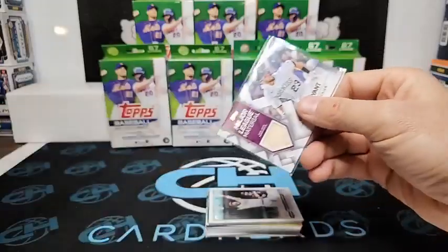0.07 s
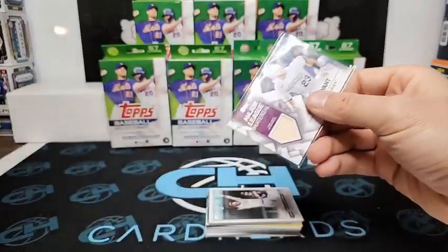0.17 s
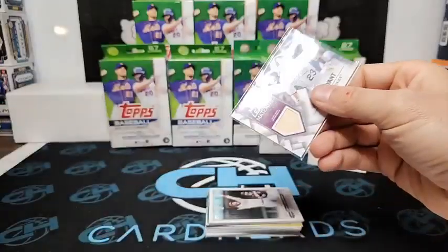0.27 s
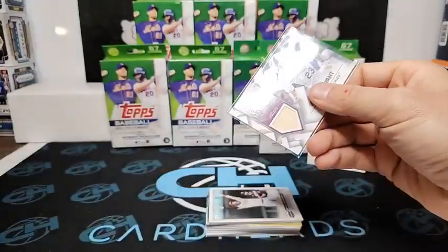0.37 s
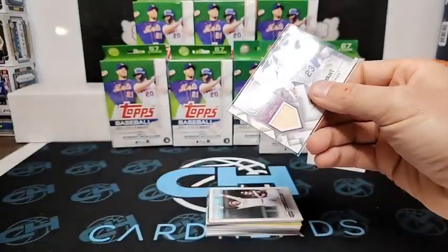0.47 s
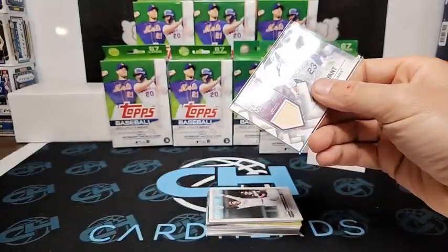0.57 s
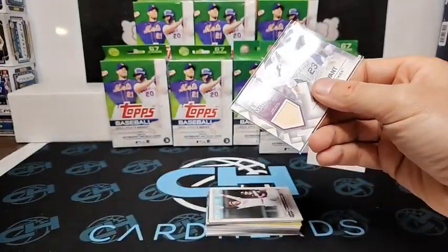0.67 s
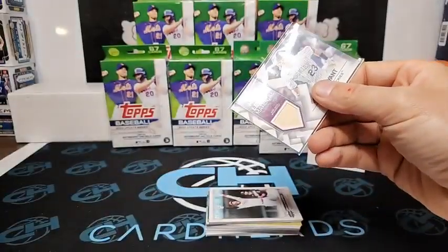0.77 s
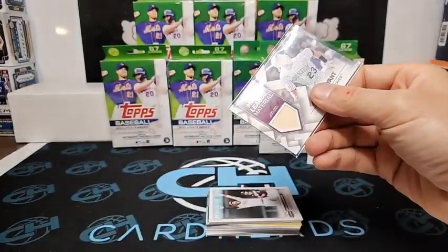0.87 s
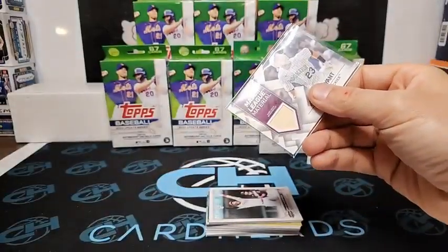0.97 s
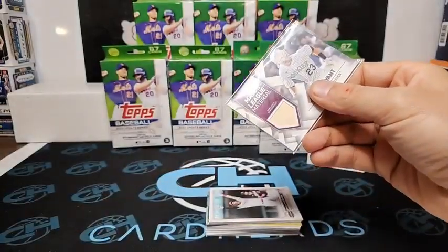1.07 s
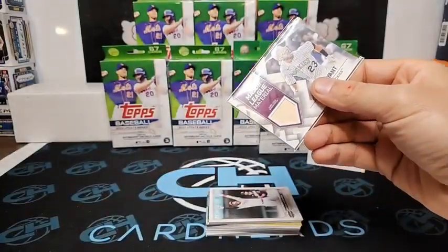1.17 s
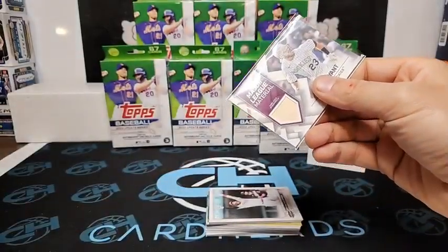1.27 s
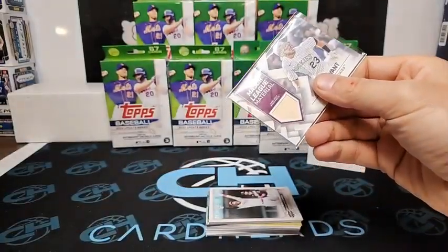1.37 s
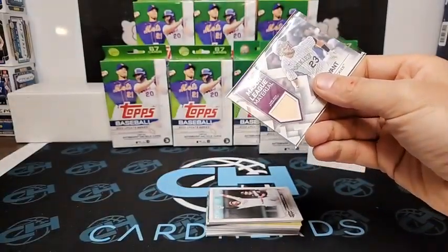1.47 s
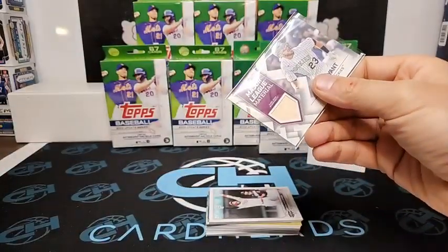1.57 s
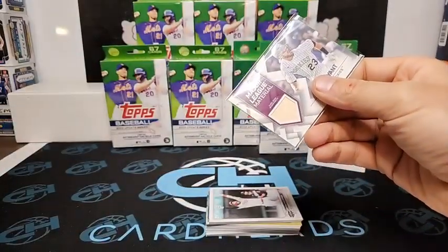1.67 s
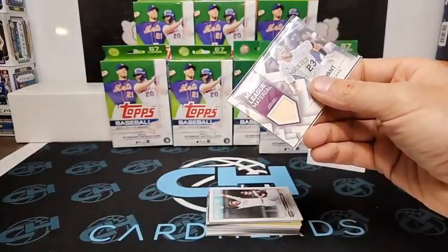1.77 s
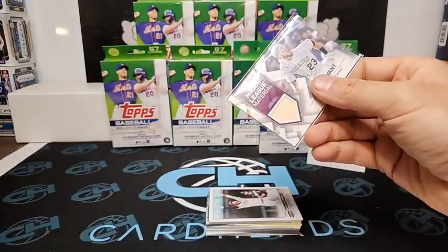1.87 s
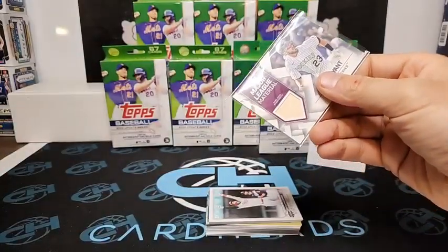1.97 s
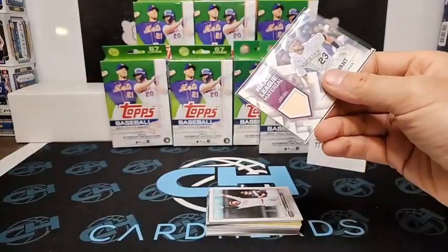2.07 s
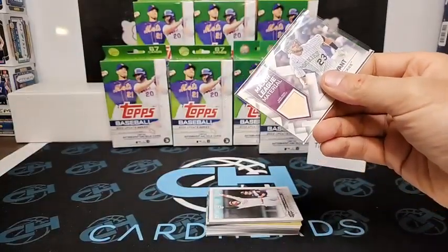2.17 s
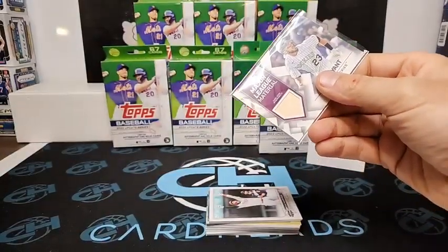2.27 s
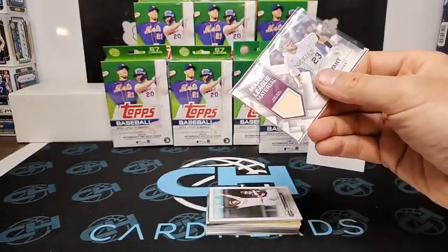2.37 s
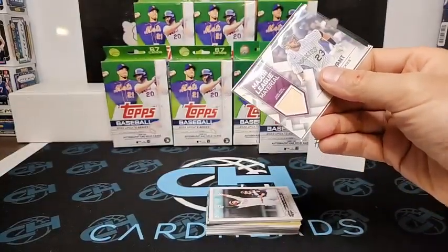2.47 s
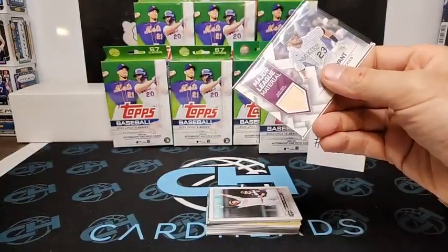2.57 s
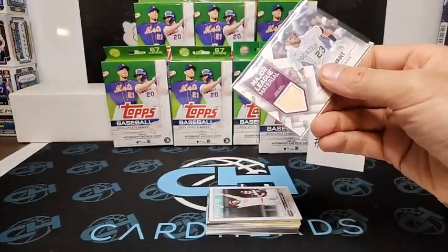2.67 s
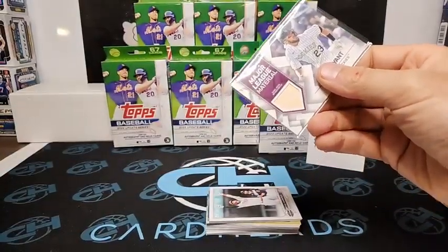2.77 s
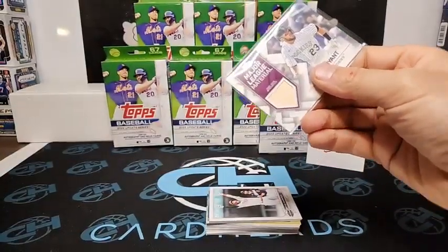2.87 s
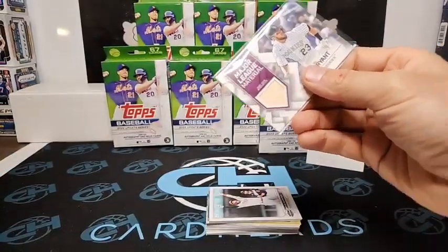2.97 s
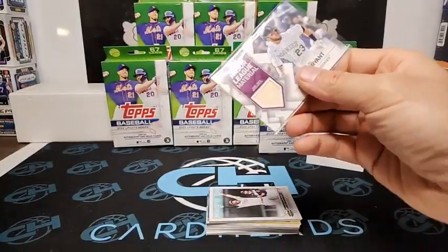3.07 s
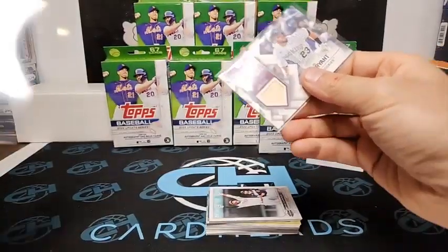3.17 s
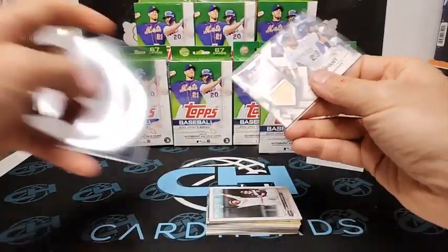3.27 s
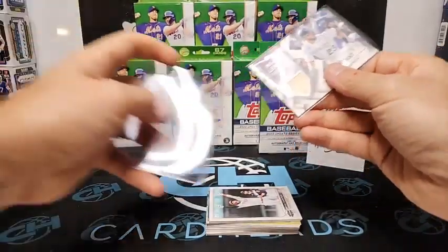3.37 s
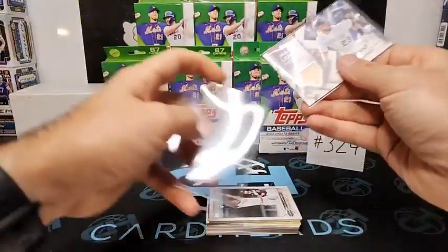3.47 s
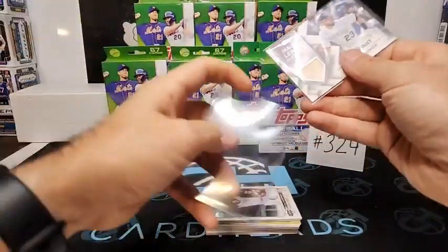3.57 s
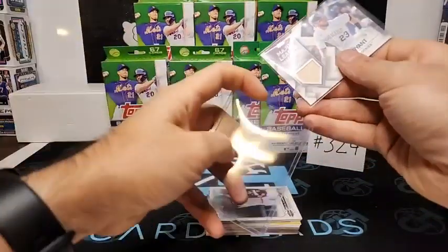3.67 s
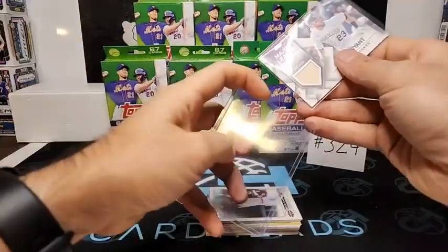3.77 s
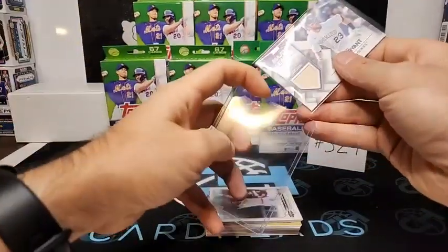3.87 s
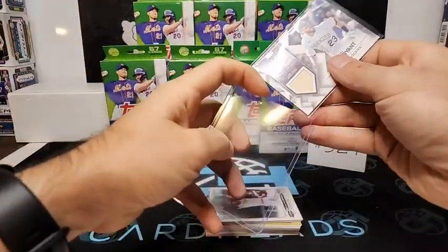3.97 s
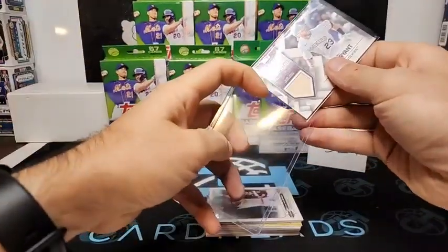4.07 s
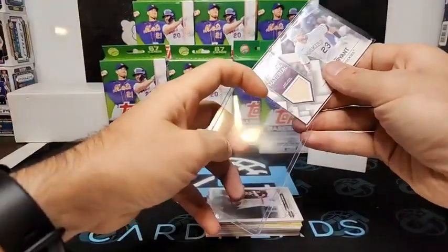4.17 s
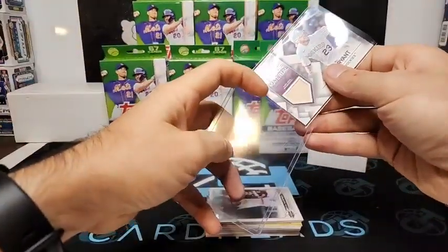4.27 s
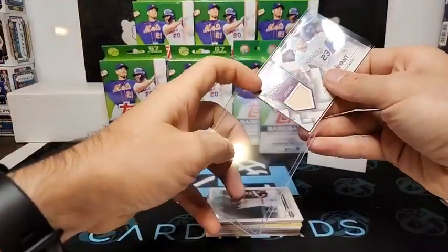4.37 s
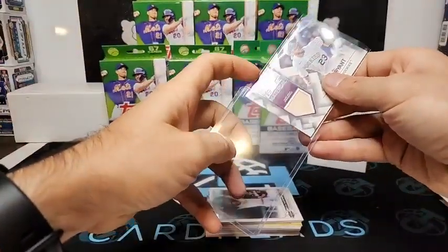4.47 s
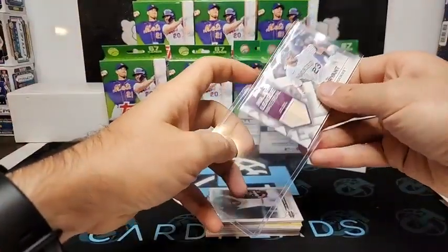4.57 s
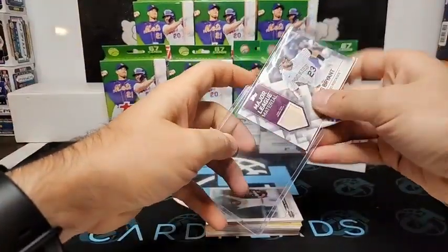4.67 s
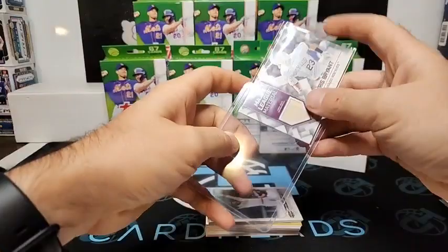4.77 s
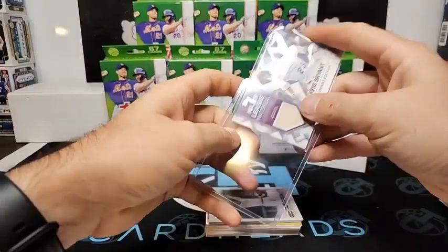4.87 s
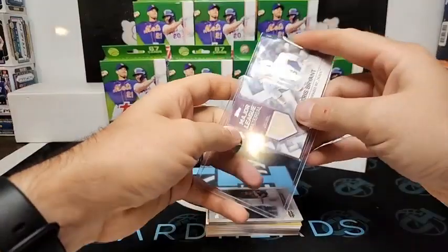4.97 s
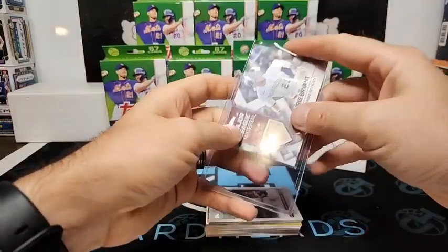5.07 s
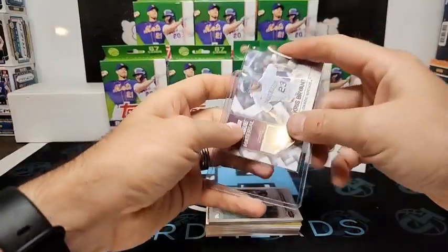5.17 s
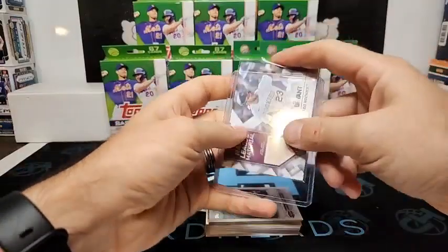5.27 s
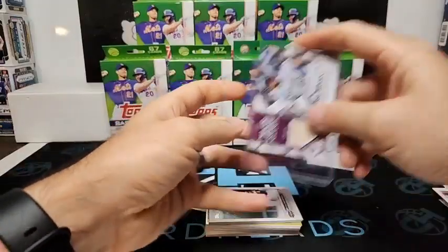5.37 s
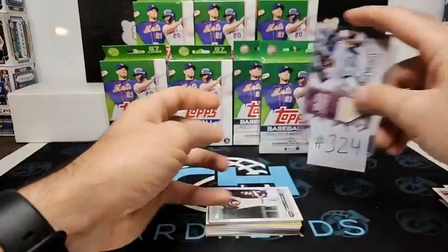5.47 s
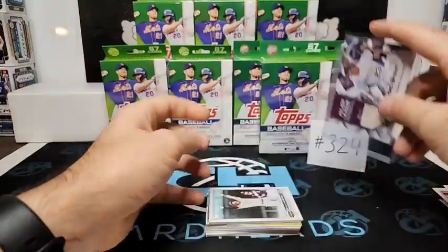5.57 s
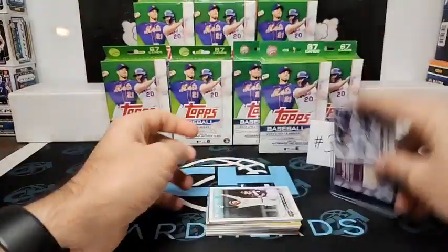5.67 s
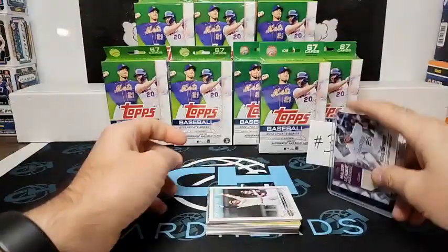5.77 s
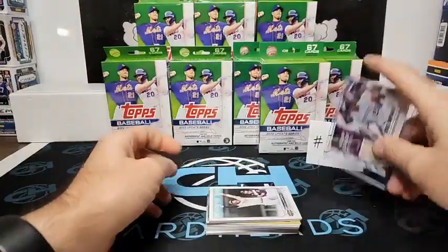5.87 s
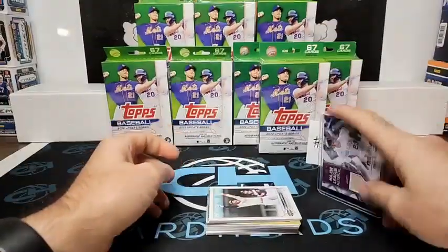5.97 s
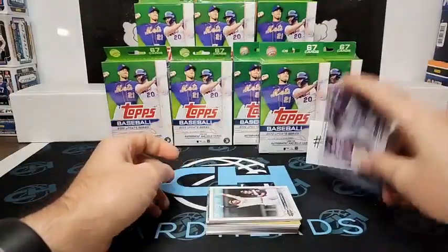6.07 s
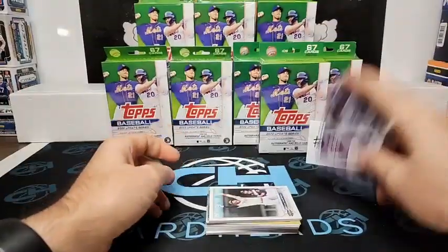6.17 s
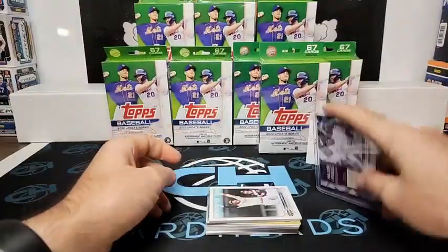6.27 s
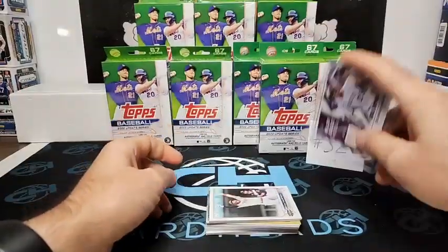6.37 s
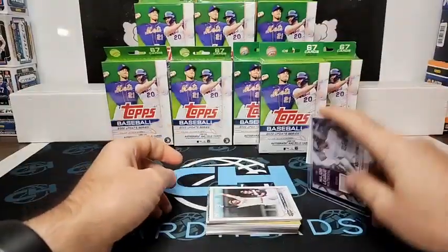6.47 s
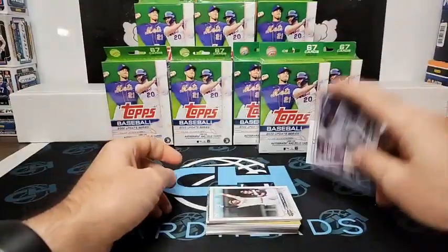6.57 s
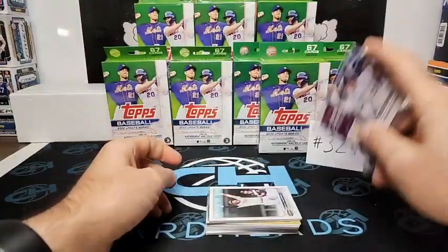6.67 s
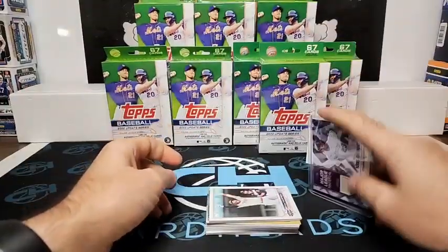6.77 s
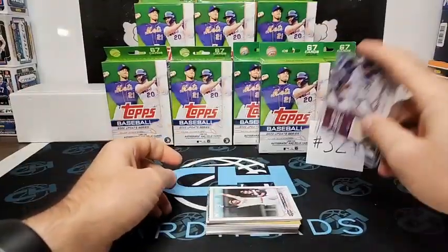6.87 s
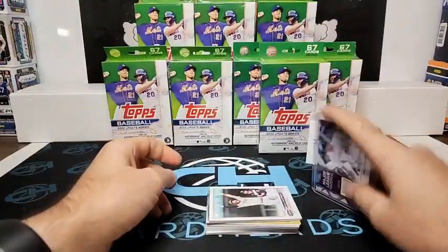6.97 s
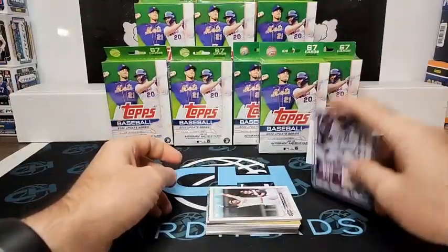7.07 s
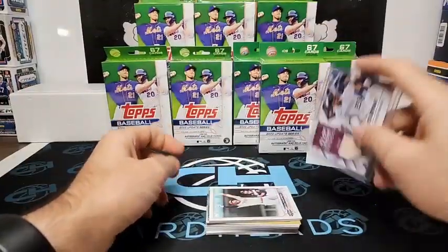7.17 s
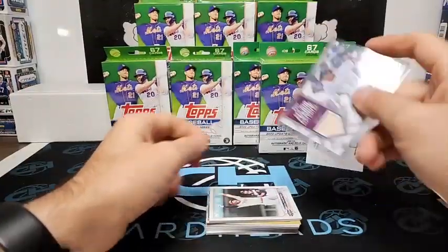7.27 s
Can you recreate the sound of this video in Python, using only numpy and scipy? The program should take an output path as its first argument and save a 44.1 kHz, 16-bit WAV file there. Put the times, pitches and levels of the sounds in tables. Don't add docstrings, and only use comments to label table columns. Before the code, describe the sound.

Close in a small furnished room with faint motor hum, a drawer rolls with a low gritty rumble. Thin plastic film crinkles. After a near-quiet pause, a rigid plastic holder creaks in a dry cluster of ticks, film rubs and squeaks faintly, and one sharp snap sounds. Then the holder's edge is knocked six times on a padded table, about four a second, with short room echo.

```python
import sys
import numpy as np
from scipy import signal
from scipy.fft import rfft, irfft
from scipy.io import wavfile

SR = 44100
rng = np.random.default_rng(int(sys.argv[2]) if len(sys.argv) > 2 else 0)


def volts_from_db(level):
    exponent = np.asarray(level, float) / 20
    return 10 ** exponent


def store_pcm(level_fs):
    pcm = np.round(np.clip(level_fs, -1, 1) * 32767).astype(np.int16)
    wavfile.write(sys.argv[1], SR, np.atleast_2d(pcm).T)


N = 322792

# (time [s], ring pitch [Hz], ring level [dB], table level [dB], crack level [dB])
TABLE_BLOWS = [
    (5.5806, 327.6, -13.5, -22.5, -41.5),
    (5.8589, 364, -12, -18.5, -29),
    (6.1023, 780, -20, -20.5, -34.5),
    (6.3703, 760, -14, -20, -37.5),
    (6.6288, 800, -19.5, -18.5, -25),
    (6.8628, 890, -22, -19, -34.5),
]


def rms_one(x):
    return x / np.sqrt(np.mean(x ** 2) + 1e-20)


def in_time(rows):
    s, *columns = np.transpose(rows)
    return [np.interp(np.arange(N) / SR, s, c) for c in columns]


def at_hz(points, hz):
    points = np.array(points)
    return np.interp(np.log(hz + 1), np.log(points[:, 0]), points[:, 1])


def colour(x, points):
    size = 8192
    hz = np.arange(size // 2 + 1) * SR / size
    cepstrum = irfft(np.log(volts_from_db(at_hz(points, hz))))
    cepstrum[1:size // 2] *= 2
    cepstrum[size // 2 + 1:] = 0
    return signal.fftconvolve(x, irfft(np.exp(rfft(cepstrum))))[:len(x)]


def band(x, low_hz, high_hz):
    sos = signal.butter(2, [low_hz, high_hz], "band", fs=SR, output="sos")
    return signal.sosfilt(sos, x + 1e-18)


def drift(rate_hz):
    r = np.exp(-2 * np.pi * rate_hz / SR)
    return rms_one(signal.lfilter([1], [1, -2 * r, r * r], rng.standard_normal(N + SR))[SR:])


def resonance(x, hz, width_hz):
    r = np.exp(-np.pi * width_hz / SR)
    poles = [1, -2 * r * np.cos(2 * np.pi * hz / SR), r * r]
    return signal.lfilter([(1 - r * r) / 2, 0, (r * r - 1) / 2], poles, x)


def grains(per_s, spread_db):
    sizes = volts_from_db(spread_db * np.minimum(rng.exponential(1, N), 4)) * rng.choice([-1, 1], N)
    return rms_one(sizes * (rng.random(N) < per_s / SR))


def gestures(rows, shares):
    t = np.arange(0, N + 32, 32) / SR
    s, db, rise, hold, fall, tone_db = np.transpose(rows)[:, :, None]
    before, after = np.maximum(s - t, 0), np.maximum(t - s - hold, 0)
    level_db = db - np.abs(rise) * before - np.abs(fall) * after
    gains = []
    for share in shares:
        power = (volts_from_db(level_db + share * tone_db) ** 2).sum(axis=0)
        gains.append(np.interp(np.arange(N) / SR, t, np.sqrt(power)))
    return gains


def knocks(blows, soft_db=0):
    # (frequency [Hz], level [dB], T60 [s])
    table_modes = [(93, 10.5, 0.09), (122.6, 15, 0.078), (147, -2.5, 0.16), (169.5, 3.5, 0.15),
                   (183.5, -5.5, 0.56), (228.7, 3.5, 0.14), (320.2, 1, 0.13), (415, 2, 0.063),
                   (424.4, -17.5, 0.44), (264.2, -14, 0.37), (760, 6, 0.027), (1207, -4, 0.044),
                   (502, -5.5, 0.14), (574, 4.5, 0.031), (692, 7, 0.033), (884, 12.5, 0.019),
                   (1130, 6.5, 0.038), (1470, 1, 0.0094), (1864, -11, 0.028), (2320, -20, 0.06),
                   (2600, -26, .06), (2980, -22.5, .05)]
    # (frequency [Hz], level [dB], T60 [s])
    shelf_modes = [(360, -15, .15), (383.6, -8, 0.14), (643, -16.5, 0.45), (746, -11, .22),
                   (920, -14.5, 0.076), (1052, -18.5, 0.26), (1177, -12, .17), (1284, -15, .15),
                   (1433, -5.5, 0.052), (1543, -14, .13), (1796, -14, .15), (1860, -21.5, 0.13),
                   (1938, -20.5, .12), (2125, -17, 0.067)]
    # (frequency [Hz], level [dB])
    slap_spectrum = [(200, -22.5), (500, -8), (1200, 1.5), (1700, -3.5), (2300, -12.5), (3000, -20.5),
                     (4000, -42), (6000, -55.5)]
    # (frequency [Hz], level [dB])
    crack_spectrum = [(1500, 17), (2500, 6), (4200, 12.5), (6500, -3), (8000, 1), (9500, -6), (12500, 5.5),
                      (14000, -33)]
    whole_table = (59, -10.5, 0.24)
    modes = table_modes + shelf_modes + [whole_table]
    push_s, deep_lag_s = .00026, .0031
    out, t = np.zeros(N + SR), np.arange(SR * 3 // 4) / SR
    draws = rng.standard_normal((len(blows), len(table_modes) + len(t)))
    for (s, ring_hz, ring_db, table_db, crack_db), draw in zip(blows, draws):
        cycles = t * ring_hz
        ring = np.exp(-(cycles / 3.8) ** 2) * np.tanh(cycles / .12) * np.sin(2 * np.pi * cycles)
        hit = band(-volts_from_db(ring_db) * ring, ring_hz / 4, 9000)

        push_db = table_db + 13 + 12.0 * np.log2(ring_hz / 820)
        hit -= volts_from_db(push_db) * np.exp(-((t - 2 * push_s) / push_s) ** 2)

        thud_db = table_db + soft_db - 13 + 5.5 * np.log2(ring_hz / 360)
        luck_db = 1.5 * draw
        for k, (hz, db, t60_s) in enumerate(modes):
            deep = hz < 140
            struck_db = thud_db if hz < 250 else table_db - 6.3 * np.log2(max(hz / ring_hz, 1))
            struck_db += 4 * np.log2(ring_hz / 820) * deep
            late = np.maximum(t - deep_lag_s * deep, 0)
            swell = (1 - np.exp(-late * hz / .5)) * (-1 if deep else 1)
            decay = volts_from_db(db + struck_db + luck_db[k] - 60 * t / t60_s)
            hit += (-1) ** k * decay * swell * np.sin(2 * np.pi * hz * late)

        fade = np.exp(-t / .002) + .35 * np.exp(-t / .014)
        hit += volts_from_db(crack_db) * colour(draw[-len(t):] * fade, crack_spectrum)
        slap = (0.52 * draw[:len(t)] - 3.8 * (t == 0)) * np.exp(-t / 0.0063)
        hit += volts_from_db(table_db + 28.8 * np.log2(ring_hz / 500)) * colour(slap, slap_spectrum)

        at, lead_length = round(s * SR), round(0.008 * SR)
        out[at:at + len(t)] += hit
        lead_in = draw[:lead_length] * np.linspace(0, 1, lead_length) ** 2
        out[at - lead_length:at] += volts_from_db(table_db - 9) * band(lead_in, 400, 1800)
    return band(out[:N], 55, 18000)


def drawer():
    # (start [s], level [dB], hold [s], fall [dB/s], sharpness [dB])
    drawer_moves = [(0.44, -69, 0.034, 198, 14.5), (0.641, -38.5, 0.061, 253, 8),
                    (0.676, -38.5, 0.097, 58.5, -4.5), (0.844, -41, 0.067, 56, -1),
                    (0.96, -40, 0.42, 258, 0.5), (1.018, -49, 0.04, 119, 18.5), (1.406, -46, 0.057, 64, -2),
                    (1.606, -52, 0.0084, 104, 20.5), (1.717, -55, 0.04, 68, -2),
                    (1.848, -61.5, .03, 296.5, 8), (1.99, -68, 0.029, 194, -4)]
    # (frequency [Hz], width [Hz], level [dB])
    carcass_modes = [(56.3, 58, -4), (126.7, 20.2, 9), (280.6, 69, 1), (535, 82, -2), (690, 136, -1),
                     (1000, 285, -11.5), (1230, 270, -49), (1590, 1700, -49)]
    # (low [Hz], high [Hz], level [dB], share of sharpness [1])
    drawer_bands = [(35, 240, -1.5, -1.08), (210, 420, 1, 0.25), (415, 1400, -8.5, 0.7),
                    (1290, 3100, -17.5, 0.93)]
    # (time [s], rate [Hz])
    roller_rate = [(.4, 235.3), (.87, 241), (.97, 250.3), (1.03, 254.2), (1.2, 264), (1.3, 276.2),
                   (1.4, 285), (2.1, 297)]
    moves = [(s, db, 1500.5, *rest) for s, db, *rest in drawer_moves]
    gains = gestures(moves, [part[-1] for part in drawer_bands])
    turns = np.cumsum(in_time(roller_rate)[0] * (1 + .022 * drift(25))) / SR
    bumps = np.diff(np.floor(turns), prepend=0) * volts_from_db(3.5 * drift(45))
    rolling = np.interp(np.arange(N) / SR, [.8, .9, 1.4, 1.5], [.1, 1, 1, .1])
    grit = rms_one(band(grains(1500, 3.0), 20, 1500))
    drive = .7 * rolling * rms_one(band(bumps, 100, 900)) + grit
    carcass = volts_from_db(-34.0) * band(drive, 39, 1200)
    for k, (hz, width_hz, db) in enumerate(carcass_modes):
        carcass = carcass + volts_from_db(db) * resonance(drive, hz, width_hz) * (-1) ** k
    out = 0
    for gain, (low, high, db, _) in zip(gains, drawer_bands):
        part = band(band(carcass, low, high), low * 1.04, high * 2.07)
        out = out + gain * volts_from_db(db) * rms_one(part)
    return out


def rubbing():
    # (frequency [Hz], level [dB])
    rub_spectrum = [(350, -30.5), (650, -4.5), (1300, -12.5), (2300, -9.5), (3400, -7), (4800, -7),
                    (6300, -16), (7800, -6), (9300, -10.5), (11000, 0.5), (12800, 6.5), (14000, -16)]
    # (start [s], level [dB], hold [s], fall [dB/s], brightness [dB])
    film_jerks = [(0.009, -87.5, .005, 300, 15), (0.116, -79, .005, 130, 1), (0.43, -81, 0.0084, 140, -7),
                  (0.639, -53.5, .02, 300, -12), (1.012, -64.5, 0.018, 96.5, -28),
                  (1.605, -62.5, 0.023, 154, -14), (1.484, -69.5, .005, 127, 0),
                  (1.733, -59, 0.063, 302, -13.5), (2.868, -57, 0.0055, 108, -7),
                  (3.204, -60.5, 0.0094, 500, -1.5), (3.23, -72.5, 0.033, 123, -22),
                  (3.36, -58.5, 0.079, 452, -2.5), (3.496, -56, 0.032, 196, 1),
                  (3.632, -59, .005, 326, -10), (3.752, -60.5, 0.0056, 163, -9.5),
                  (3.827, -60.5, .005, 270, -5), (4.199, -57.5, 0.0055, 345, -0.5),
                  (4.338, -62, 0.04, 119, 4.5), (4.442, -68, 0.057, 85, 7.5), (4.541, -62, 0.063, 909, 5.5),
                  (4.716, -51, 0.0016, 602, 9), (4.744, -61.5, 0.011, 57, 5), (5.3, -53.5, 0.0098, 700, -3)]
    # (start [s], level [dB], hold [s], fall [dB/s],
    # brightness [dB])
    card_settles = [
        (5.58, -54.5, 0.0061, 398, 12),
        (5.858, -48, 0.014, 235, -1),
        (6.156, -58, 0.036, 700, -3.5),
        (6.392, -54.5, 0.0043, 218, -8.5),
        (6.65, -47.5, 0.079, 796.5, -7),
        (6.737, -63, 0.072, 500, -8),
        (6.887, -56, 0.086, 598.5, -5.5),
        (6.998, -66.5, 0.005, 76, -7),
    ]
    # (peak [s], level [dB], rise [dB/s], fall [dB/s], brightness [dB])
    film_strokes = [(0.664, -49.5, 508, 119, -14), (1.051, -67, 40, 26, -16.5),
                    (1.873, -46.5, 407, 290, -4.5), (2.046, -73, 48, 297, -16), (2.858, -81, 107, 500, -2),
                    (3.124, -82, 142, 77, 8.5), (4.152, -99.5, 103, 386, 28), (5.05, -89, 85, 62, 25.5),
                    (5.144, -74, 99, 189, 14), (5.284, -56.5, 183, 1004, -9), (5.45, -75, 4.5, 9, -6),
                    (6.098, -61, 299, 1500, -7), (5.689, -46.5, 900, 298, -4), (5.689, -46.5, 900, 298, -4),
                    (7.22, -79.5, 75, 146, 9.5), (7.31, -78, 149.5, 100, 2)]
    jerk_db_per_s = 6000
    moves = [(s, db, jerk_db_per_s, *rest) for s, db, *rest in film_jerks + card_settles]
    moves += [(s, db, rise, 0, fall, bright_db) for s, db, rise, fall, bright_db in film_strokes]
    moves += [(blow[0], -71, 299, 0, jerk_db_per_s, -2) for blow in TABLE_BLOWS[1:]]
    level, bright = gestures(moves, [0, 1])
    slips = colour(grains(5000, 0.83) * volts_from_db(.8 * drift(40)), rub_spectrum)
    edges, patches = np.geomspace(420, 6800, 10), 0
    for k in range(9):
        patch = band(slips, edges[k], edges[k + 1]) * volts_from_db(1.6 * drift(14))
        patches = patches + patch * (-1) ** k
    top = -rms_one(band(slips, 4600, 11000)) * volts_from_db(2.0 * drift(18))
    return volts_from_db(-4.0) * (level * rms_one(patches) + bright * top)


def snaps(rows, share=0.47, burst_s=0.0035, width_hz=1000):
    # (frequency [Hz], level [dB])
    snap_spectrum = [(180, -73), (300, 4.5), (647, -7.5), (736, -18), (1130, -7.5), (1890, -8.5),
                     (2260, -9.5), (2960, -8), (3890, -7), (9400, -7.5), (12500, 1), (13800, -13)]
    out, t = np.zeros(N), np.arange(1400) / SR
    draws = rng.standard_normal((len(rows), len(t)))
    for (s, peak_db, hz, top_db), noise in zip(rows, draws):
        click = noise * share * np.exp(-t / burst_s) + 1.73 * (t == 0)
        click = colour(click, snap_spectrum)
        body = band(band(click, hz / 8.5, 9700), hz / 19.0, 16200)
        burst = body + 3.1 * resonance(body * 0 + click, hz, width_hz)
        burst = burst + volts_from_db(top_db + 10.5) * band(click, 6700, 19200)
        at = round(s * SR)
        out[at:at + len(t)] += volts_from_db(peak_db) * burst / np.abs(burst).max()
    return out


def creaks():
    # (time [s], peak level [dB], pitch [Hz])
    creak_ticks = [(3.3585, -47, 3850), (3.363, -53, 3770), (3.3659, -43, 3800), (3.381, -37, 3850),
                   (3.385, -43, 3560), (3.39, -39, 3700), (3.4, -59, 3500), (3.408, -36, 3780),
                   (3.4146, -35, 3880), (3.423, -35.5, 3650), (3.4272, -34.5, 3870), (3.431, -38, 3970),
                   (3.4485, -34, 3700), (3.4973, -30.5, 3700), (3.5088, -39, 2900), (3.521, -34, 3100),
                   (3.5288, -31, 3960), (3.544, -32, 3370), (3.5532, -30, 3060), (3.555, -50, 3240),
                   (3.5707, -32.5, 4010), (3.579, -45, 3900), (3.6358, -29.5, 3800), (3.682, -45, 3650),
                   (3.7554, -36.5, 3450), (3.7865, -51, 4310), (3.8308, -37, 3300), (3.8447, -40, 3850)]
    rows = [(s, db, hz, -8.5 + 17 * np.log2(hz / 3700)) for s, db, hz in creak_ticks]
    return snaps(rows, share=0.23, burst_s=0.0028, width_hz=1140)


def squeak():
    # (start [s], length [s], from [Hz], top [Hz], level [dB])
    film_chirps = [
        (.115, 0.043, 3110, 3500, -56),
        (2.035, 0.048, 4130, 4400, -59.5),
        (4.462, 0.059, 3390, 3580, -46),
    ]
    # (start [s], length [s], from [Hz], top [Hz], level [dB])
    film_whines = [
        (4.752, .03, 4500, 5300, -68),
        (4.822, .045, 4500, 5400, -69),
        (4.862, .075, 3500, 5350, -65),
        (4.958, .04, 3900, 5050, -68),
        (5.045, .03, 3300, 3900, -71),
    ]
    out, rough = np.zeros(N), drift(270)
    for rows, arch in ((film_chirps, .5), (film_whines, 1)):
        for s, length_s, from_hz, top_hz, db in rows:
            x = np.arange(round(length_s * SR)) / (length_s * SR)
            if arch == 1:
                shape = np.sqrt(np.sin(np.pi * x))
            else:
                shape = np.minimum(x * 10, 1) * volts_from_db(-35 * x)
            hz = from_hz + (top_hz - from_hz) * np.sin(np.pi * arch * x)
            tone = np.sin(2 * np.pi * np.cumsum(hz) / SR)
            out[round(s * SR):][:len(x)] += volts_from_db(db) * shape * tone
    return out * (.55 + .7 * rough)


def fingers():
    # (start [s], level [dB], hold [s], fall [dB/s], centre [Hz])
    finger_touches = [(2.8, -75.5, 0.3, 53, 1870), (2.9, -74.5, 0.58, 61, 447),
                      (3.11, -76, 0.058, 300, 4300), (6.6, -80.5, .025, 290, 4200),
                      (4.43, -67, 0.058, 300, 4860), (4.9, -68.5, 0.082, 599.5, 4700),
                      (4.9, -69, 0.028, 310, 4800), (5.425, -82, 0.0075, 208, 3500),
                      (4.4, -71.5, 0.1, 150, 3340), (5.68, -56.5, .03, 306.5, 3800),
                      (5.1, -73, 0.062, 202, 5050), (7.15, -78.5, 0.092, 203, 4800),
                      (0.43, -71, 0.014, 200, 950), (2.5, -90, 0.19, 62, 1680), (0.12, -80, .03, 148, 3500)]
    grain, out = grains(3000, 2.0) * volts_from_db(2.5 * drift(15)), 0
    for s, db, hold, fall, hz in finger_touches:
        width_hz = 0.26 * hz
        gain = gestures([(s, db, 701, hold, fall, 0)], [0])[0]
        out = out + gain * rms_one(resonance(resonance(grain, hz, width_hz), hz, width_hz))
    return out


def walls(x):
    echo_delays = [.0112, .0195, .0297]
    echo_levels = [-19.5, -16.5, -16]
    echoes = sum(volts_from_db(db) * np.roll(x, round(s * SR)) for s, db in zip(echo_delays, echo_levels))
    return -band(echoes, 200, 2400)


def room(x):
    # (frequency [Hz], level [dB])
    room_level = [(82, -12.5), (190, -4), (300, -9.5), (500, -8), (900, -8.5), (1400, -6.5), (2020, -7.5),
                  (2780, -10), (4150, -13.5), (11100, -15.5)]
    # (frequency [Hz], T60 [s])
    room_decay = [(80, 1), (190, 1), (300, .85), (500, .62), (900, .35), (1400, .28), (2000, .23),
                  (2800, .25), (4150, .3), (11000, .18)]
    t, tail = np.arange(SR) / SR, 0
    edges = 40 * 2 ** np.arange(0, 8.8, .3)
    white = rng.standard_normal((2, SR))
    for k, (low, high) in enumerate(zip(edges, edges[1:])):
        hz = np.sqrt(low * high)
        t60_s = at_hz(room_decay, hz)
        decay = volts_from_db(at_hz(room_level, hz) - 60 * t / t60_s) / np.sqrt(t60_s * SR / 14)
        tail = tail + band(white[k % 2], low, high) * decay
    tail = tail * (1 + volts_from_db(9.5 - 60 * t / 0.033))
    onset = np.clip((t - .004) / 0.00067, 0, 1)
    return signal.fftconvolve(x, tail * onset)[:N]


def air():
    # (frequency [Hz], level [dB])
    air_spectrum = [(15, -57.5), (25, -39.5), (48, -9.5), (84, -20), (122, -9), (159, -17), (333, -10.5),
                    (522, -30), (644, -27), (735, -26), (1150, -29), (5620, -50), (12400, -46.5),
                    (13800, -52.5)]
    # (frequency [Hz], width [Hz], level [dB])
    motor_lines = [(59, 6.0, -83), (123.6, 3.4, -76.5), (654, 23, -85.5), (1830, 390, -89.5)]
    hum = volts_from_db(-67.5 + 1.7 * drift(1.9)) * np.sin(2 * np.pi * 118.0 * np.arange(N) / SR)
    for hz, width_hz, db in motor_lines:
        line = resonance(resonance(rng.standard_normal(N), hz, width_hz), hz, width_hz)
        hum += volts_from_db(db + 2.5 * drift(2)) * rms_one(line)
    sway = volts_from_db(1.3 * drift(3))
    return volts_from_db(-70.5) * sway * rms_one(colour(rng.standard_normal(N), air_spectrum)) + hum


def scene():
    # (time [s], peak level [dB], pitch [Hz], top share [dB])
    crease_snaps = [(0.118, -59, 3070, -10), (0.639, -40, 5060, -14), (1.8774, -32.5, 3930, -44),
                    (2.8684, -42, 2070, -2), (3.0093, -52.5, 1520, -1), (3.2086, -46, 3700, -10),
                    (4.202, -31.5, 3560, -10.5), (4.3458, -44, 2110, -43), (4.703, -52, 3600, -4),
                    (4.7187, -21, 7600, -6.5), (4.7222, -45, 7140, -14), (5.255, -58, 3800, -20),
                    (5.2737, -38.5, 5500, -9), (5.2801, -36.5, 5400, -4), (5.3048, -37.5, 2520, -9.5),
                    (5.5961, -31, 1670, 1), (5.6244, -44, 1800, -12)]
    # (time [s], ring pitch [Hz], ring level [dB], table level [dB],
    # crack level [dB])
    close_bumps = [
        (1.6015, 769, -44, -60, -74),
        (4.2008, 301, -31, -49, -60.5),
        (5.233, 1000, -52.5, -80.5, -74),
        (5.595, 328, -23.5, -42, -43),
    ]
    # (frequency [Hz], level [dB])
    side_spectrum = [(2800, -100), (3700, -55), (4400, -18), (6000, -13), (9000, -8), (13000, -10)]
    blows, ticks = knocks(TABLE_BLOWS), creaks()
    loud = blows + snaps(crease_snaps)
    near = knocks(close_bumps, soft_db=12.5)
    wet = room(loud + volts_from_db(-7) * near + volts_from_db(-2) * ticks) + walls(blows)
    mid = loud + ticks + near + wet + drawer() + rubbing() + squeak() + fingers() + air()
    side = colour(mid * np.tanh(3 * drift(120)), side_spectrum)
    return np.array([mid + side, mid - side])


def roll_off(x):
    return signal.sosfilt(signal.butter(12, 14320, fs=SR, output="sos"), x)


def record(dry):
    shelf_sos = signal.ellip(10, .5, 26, 13150, fs=SR, output="sos")
    mix = signal.sosfilt(shelf_sos, dry)
    return roll_off(mix)


dry = scene()
out = record(dry)
store_pcm(out)
```